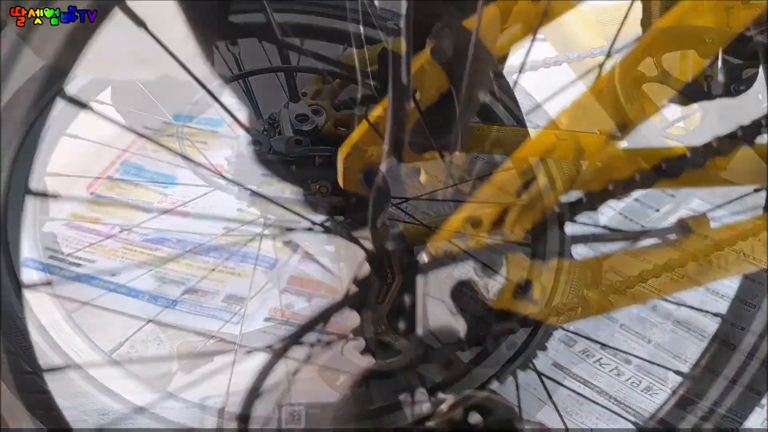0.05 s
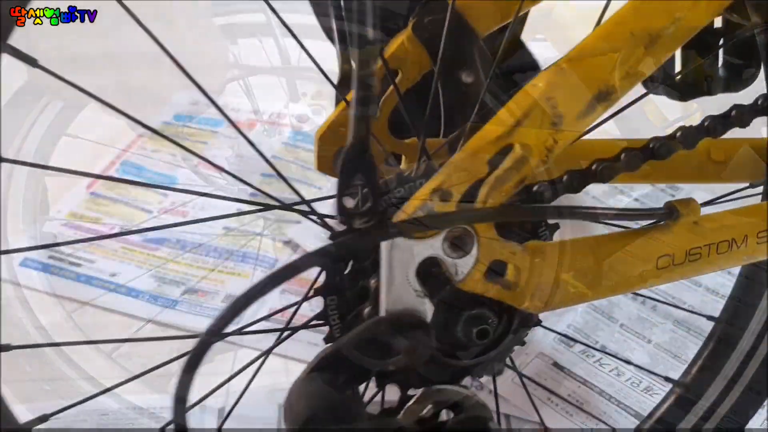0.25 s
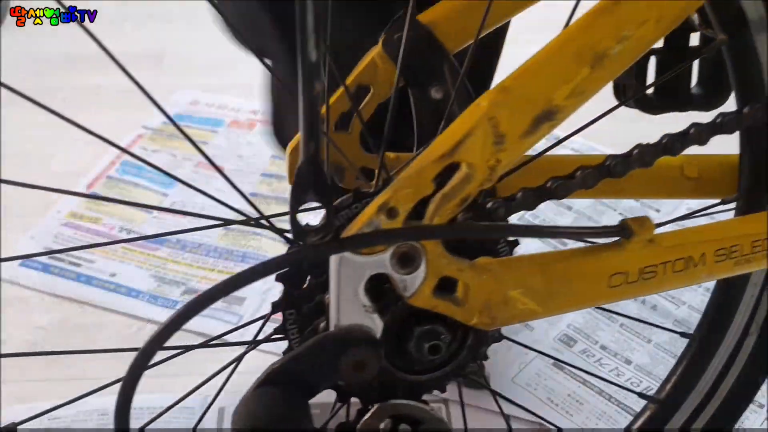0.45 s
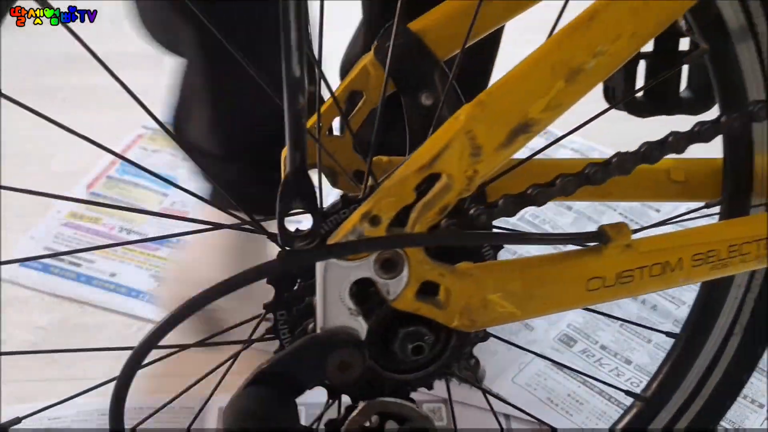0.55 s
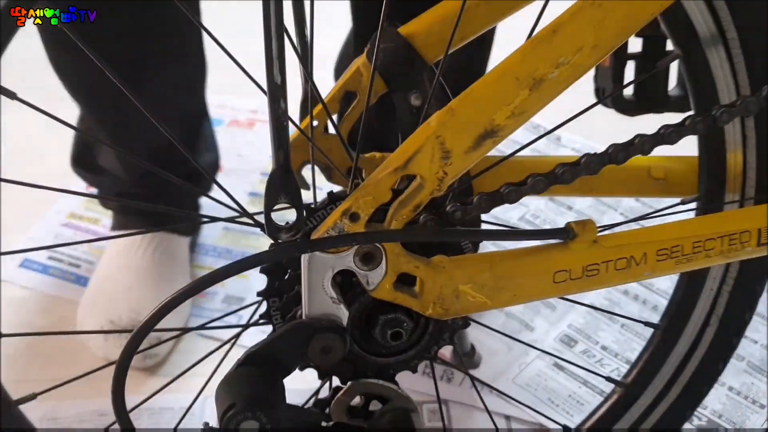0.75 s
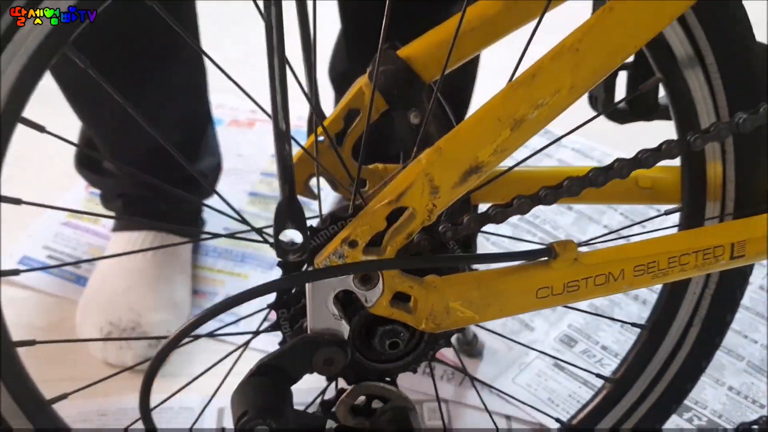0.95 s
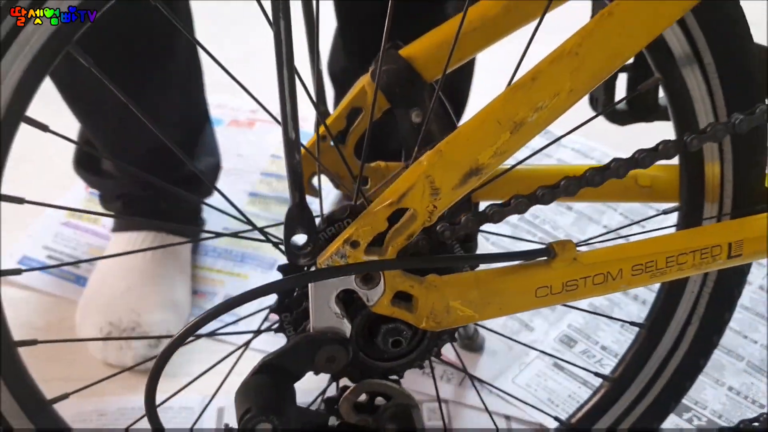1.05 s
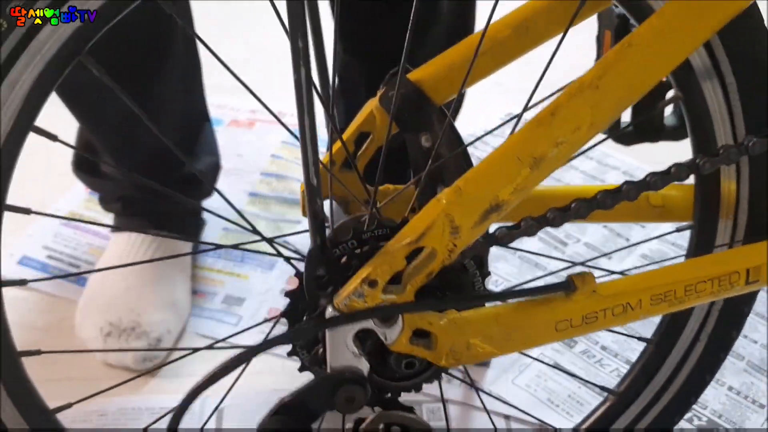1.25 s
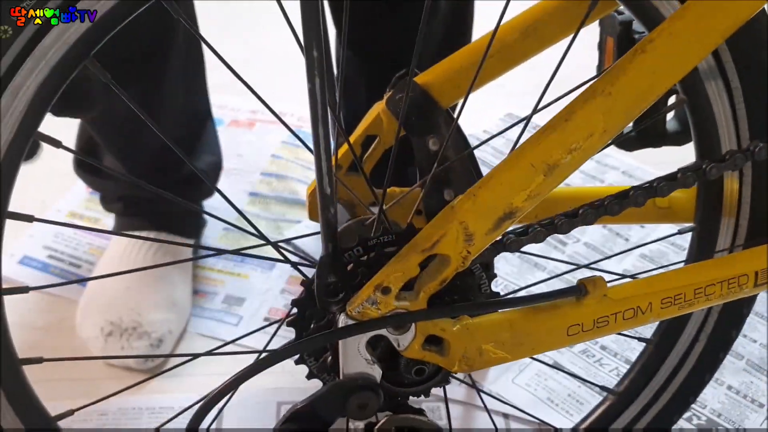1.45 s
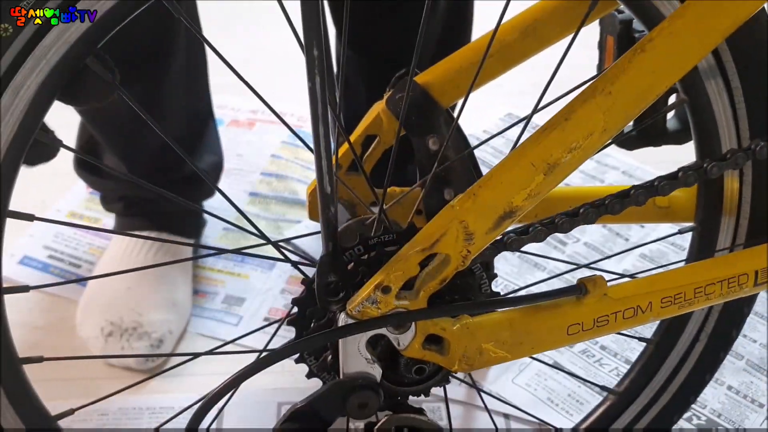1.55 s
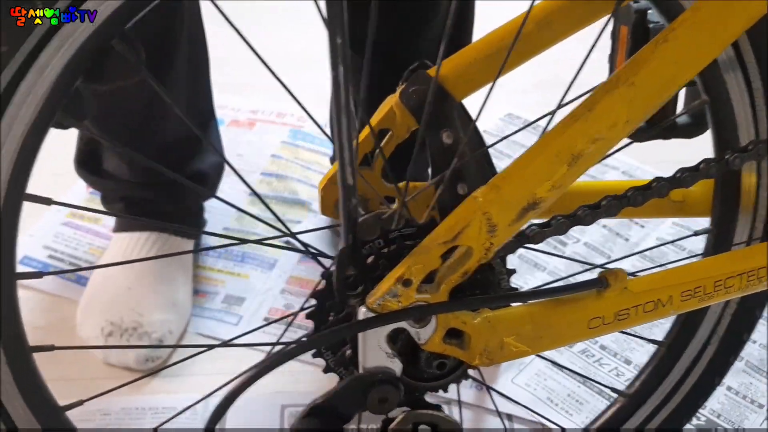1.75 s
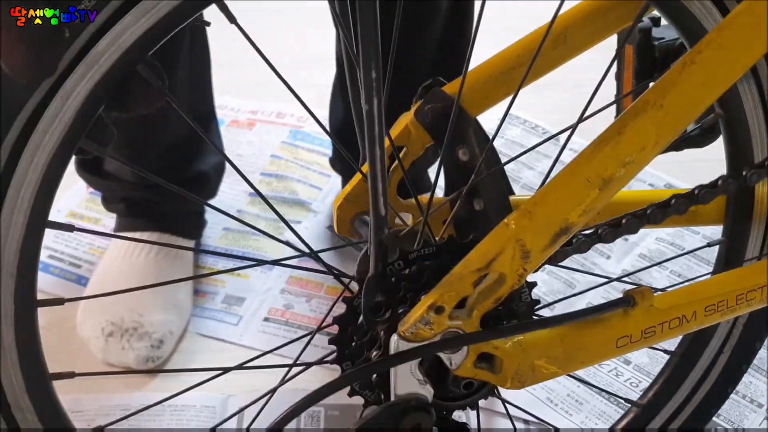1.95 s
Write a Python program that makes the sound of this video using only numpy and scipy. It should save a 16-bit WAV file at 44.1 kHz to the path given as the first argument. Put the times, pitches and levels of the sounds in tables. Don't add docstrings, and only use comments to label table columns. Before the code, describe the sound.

A bicycle strut scrapes and snaps onto its frame with a loud, bright clank at 0.14 seconds, rebounding rapidly and ringing briefly in a small hard room. A soft sock scuff comes near 0.5. At 1.07 a knock and tick arrive with a low microphone bump, then scattered clicks and dull knocks at 1.3, 1.5 and 1.8, ending in a busier cluster near 1.95. Newspaper rustles over faint rumble and hiss.

```python
import sys
import numpy as np
from scipy import signal
from scipy.io import wavfile

SR = 44100
rng = np.random.default_rng(int(sys.argv[2]) if len(sys.argv) > 2 else 0)


def rack_gain(trim_db):
    fader = np.asarray(trim_db, float)
    return 10 ** (fader / 20)


def to_wav(sig):
    pcm = np.clip(np.atleast_2d(sig), -1, 1) * 32767
    pcm = np.round(pcm).astype(np.int16)
    wavfile.write(sys.argv[1], SR, pcm.T)


N = 88200

# t/s, level/dB, left-right/dB
CLANK = [
    (.1410, -25, 4.0),
    (.1430, -12, 2.5),
    (.1476, -19, 2.5),
    (.1494, -20, 1.5),
    (.1532, -24, 1.5),
    (.1572, -22, 1.5),
    (.1622, -29, 1.5),
    (.1792, -33, 1.5),
]
# f/Hz, level/dB
CRACK = [(330, -23.5), (600, -6.5), (1500, -10), (3300, -3), (6500, -17), (11000, -14), (14500, -22.5),
         (16500, -50)]
EDGES = 25 * 2 ** np.arange(0, 9.6, .5)


def at_hz(points, hz):
    table = np.array(points)
    return np.interp(np.log(hz), np.log(table[:, 0]), table[:, 1])


def rms_one(x):
    return x / np.sqrt(np.mean(x ** 2) + 1e-20)


def drift(rate):
    points = rng.standard_normal(N // 200)
    return np.interp(np.arange(N) / SR * rate, np.arange(len(points)), points)


def ring(x, hz, t60):
    r, w = rack_gain(-60 / (t60 * SR)), 2 * np.pi * hz / SR
    return signal.lfilter([0, np.sin(w)], [1, -2 * r * np.cos(w), r * r], x + 1e-18)


def band(x, low, high):
    sos = signal.butter(2, [low, min(high, .45 * SR)], "band", fs=SR, output="sos")
    return signal.sosfilt(sos, x)


def coloured(x, spectrum, patchy_db=0):
    # f/Hz, likeness/1
    likeness = [(40, 0.44), (300, 0.77), (4000, 0.051), (15000, 0.032)]
    out = 0
    for k, (low, high) in enumerate(zip(EDGES, EDGES[1:])):
        mid, side = band(x[k % len(x)], low, high)
        hz = np.sqrt(low * high)
        alike = np.clip(at_hz(likeness, hz), -1, 1)
        ports = np.sqrt(1 + alike) * mid + np.sqrt(1 - alike) * side * [[1], [-1]]
        out = out + rack_gain(at_hz(spectrum, hz) + patchy_db * drift(13)) * ports
    return rms_one(out)


def grains(rate, spread_db):
    sizes = rack_gain(spread_db * np.minimum(rng.exponential(1, N), 4)) * rng.choice([-1, 1], N)
    return rms_one(sizes * (rng.random(N) < rate / SR))


def swell(rows):
    t = np.arange(N) / SR
    return sum(rack_gain(db) * np.interp(t, [s, s + rise, s + rise + fall], [0, 1, 0]) ** 0.86
               for s, rise, fall, db in rows)


def add(out, s, sound, pan_db):
    i = int(s * SR)
    sides = rack_gain(np.array([[pan_db / 2], [-pan_db / 2]]))
    out[:, i:i + sound.shape[-1]] += (sound * sides)[:, :N - i]


def hiss():
    # f/Hz, level/dB
    hiss_colour = [(150, -19.5), (300, -35.5), (700, -1.5), (2000, -8), (5000, -6), (8000, -16),
                   (11000, -9), (16000, -18)]
    noise = coloured(rng.standard_normal((2, 2, N)), hiss_colour, patchy_db=1.2)
    return rack_gain(-68.5) * noise * rack_gain(np.array([[.6], [-.6]]))


def rumble():
    # f/Hz, level/dB
    rumble_colour = [(25, -16.5), (50, -6.5), (80, -1.5), (130, -12.5), (220, -17.5), (400, -17),
                     (800, -42)]
    # t/s, rise/s, fall/s, level/dB
    flexes = [(-.05, 0.059, 0.27, -66), (.14, 0.031, 0.2, -55), (.37, 0.043, 0.028, -65.5),
              (.44, 0.029, 0.085, -61), (.59, 0.026, 0.093, -72), (.68, 0.024, 0.064, -68.5),
              (1.15, 0.04, 0.2, -70), (1.28, 0.041, 0.29, -57), (1.55, 0.069, 0.065, -67),
              (1.76, 0.023, .08, -67), (1.9, 0.037, 0.099, -46)]
    noise = coloured(rng.standard_normal((2, 2, N)), rumble_colour, patchy_db=1.2)
    return (rack_gain(-69.5) + swell(flexes)) * noise


def paper():
    # f/Hz, level/dB
    paper_colour = [(300, -23.5), (600, -2.5), (1000, -3), (2500, 0.5), (5000, -4.5), (8000, -10),
                    (12000, -8), (16000, -13.5)]
    # t/s, rise/s, fall/s, level/dB
    rustles = [(-.05, 0.046, 0.48, -53), (.43, 0.031, 0.091, -81), (.69, 0.015, 0.39, -64),
               (.85, 0.015, 0.051, -63.5), (.945, 0.015, 0.035, -63.5), (.975, 0.016, 0.13, -56),
               (1.06, 0.014, 0.16, -59.5), (1.24, 0.038, 0.066, -58.5), (1.29, 0.014, 0.16, -56.5),
               (1.41, 0.032, 0.1, -61.5), (1.49, 0.041, 0.085, -56), (1.76, 0.014, 0.097, -57),
               (1.82, 0.035, 0.062, -55.5), (1.89, 0.041, 0.077, -55), (1.94, 0.028, 0.046, -45.5)]
    grains_per_s, grain_db = 700, -5
    crackle = np.array([[grains(grains_per_s, 1.6), grains(grains_per_s, 4.0)]])
    rustle = rng.standard_normal((2, 2, N)) + rack_gain(grain_db) * crackle
    return swell(rustles) * coloured(rustle, paper_colour, patchy_db=2)


def bumps():
    # t/s, level/dB, f/Hz, t60/s
    bump_swings = [
        (1.004, -31.5, 261.5, 0.07),
        (1.004, -37.5, 128.5, 0.42),
        (1.013, -22, 53.7, 0.16),
        (1.054, -48.5, 53.3, 0.57),
        (1.905, -39, 58.4, 0.42),
        (1.944, -29.5, 57.6, 0.1),
    ]
    leak_db = -25.5
    out, t = np.zeros((2, N)), np.arange(SR // 2) / SR
    for s, db, hz, t60 in bump_swings:
        swing = -np.sin(2 * np.pi * hz * t) * rack_gain(-60 * t / t60) * np.minimum(t * hz * 2, 1)
        add(out, s, rack_gain(db + leak_db / 2) * swing[None], leak_db)
    return out


def rubbing(strokes, peaks):
    slips_per_s = 4500
    slips = np.array([grains(slips_per_s, 3.0), grains(slips_per_s, 3.0)])
    slips = slips + 0.4 * slips[::-1]
    body = sum(rack_gain(db) * rms_one(ring(slips, hz, 2.2 / width)) for hz, width, db in peaks)
    return swell(strokes) * rms_one(body)


def scuff():
    # t/s, rise/s, fall/s, level/dB
    scuff_strokes = [
        (.51, 0.053, 0.09, -59.5),
    ]
    # f/Hz, width/Hz, level/dB
    scuff_peaks = [(940, 360, 0.1), (1400, 220, 0), (2500, 180, 1.6), (3060, 160, 0.58)]
    return band(rubbing(scuff_strokes, scuff_peaks), 560, 3120)


def knocks():
    # t/s, peak/dB, f/Hz, t60/s, left-right/dB
    knock_hits = [(.07, -57.5, 450, 0.24, 4), (.705, -53.5, 726, 0.017, 4), (1.0738, -39, 377, 0.02, 1.5),
                  (1.0718, -35, 788, 0.039, 2.5), (1.0715, -32.5, 1860, 0.031, 9),
                  (1.13, -58, 290, 0.038, -5), (1.302, -49.5, 294, 0.22, 13), (1.3085, -36, 810, 0.022, 1),
                  (1.321, -44, 1400, 0.091, 1), (1.36, -50.5, 156.5, 0.14, -2),
                  (1.5165, -32, 670, 0.026, 0), (1.519, -42.5, 221.4, 0.02, 1), (1.536, -39, 640, 0.07, -2),
                  (1.552, -48.5, 700, 0.017, 2), (1.619, -48, 166.5, 0.074, -4),
                  (1.78, -56.5, 190, 0.063, 0), (1.83, -57, 265, 0.3, -10), (1.94, -37, 347, 0.028, -2),
                  (1.949, -43.5, 1260, 0.021, 12), (1.869, -49.5, 308, 0.24, -9),
                  (1.974, -39, 650, 0.077, 0)]
    # multiple of pitch/1, level/dB
    knock_body = [(.3, -24), (.55, -9.5), (.79, -2), (1.06, 3.8), (1.7, -8), (2.7, -13.5)]
    edge = .6
    out, t = np.zeros((2, N)), np.arange(SR // 4) / SR
    for s, db, hz, t60, pan_db in knock_hits:
        rough = rng.standard_normal((2, len(t))) * 0.72 + rng.standard_normal(len(t))
        push = rough * rack_gain(-60 * t / t60) + edge * np.sqrt(t60 * SR) * (t == 0)
        body = sum(rack_gain(g_db) * ring(push, hz * m, 17.6 / (hz * m)) * np.sqrt(m) for m, g_db in knock_body)
        add(out, s, rack_gain(db) * body / np.abs(body).max(), pan_db)
    return out


def ticks():
    # t/s, peak/dB, f/Hz, t60/s, left-right/dB
    tick_hits = [(.462, -53, 9540, .008, -4), (0.5157, -50.5, 7200, 0.0081, 7),
                 (0.7072, -55.5, 3580, 0.017, 10), (0.858, -47, 3600, 0.032, -2),
                 (.957, -57.5, 1076, 0.033, 2), (0.964, -61, 2960, 0.018, 3),
                 (0.997, -47.5, 2470, 0.023, 7), (1.033, -52.5, 9000, 0.02, 2),
                 (1.0698, -34.5, 8100, 0.017, 3.5), (1.0692, -38, 4400, 0.0068, 5),
                 (1.14, -45, 1730, 0.013, 7.5), (1.277, -51, 3000, 0.011, 4),
                 (1.3065, -45.5, 2630, 0.052, 4), (1.309, -49.5, 1120, 0.034, 9),
                 (1.42, -51, 2140, 0.04, 3), (1.504, -56, 2500, 0.012, 6), (1.514, -53, 3060, .02, 10),
                 (1.5324, -44, 6200, 0.011, 15.5), (1.5338, -41, 4440, 0.0093, 5),
                 (1.548, -50, 1810, 0.011, 13), (1.727, -57, 4500, 0.025, 4), (1.7293, -50, 1900, 0.017, 6),
                 (1.7392, -48.5, 7650, 0.0093, 3), (1.766, -54, 5950, 0.0072, 3),
                 (1.7745, -35.5, 4200, 0.0037, 15.5), (1.788, -48, 3500, .01, 10),
                 (1.854, -43.5, 3620, 0.01, 15.5), (1.928, -52.5, 4400, 0.0091, 28),
                 (1.9385, -46, 4400, 0.015, 7), (1.946, -36.5, 3540, 0.0094, 8),
                 (1.956, -37, 3400, 0.0086, 5), (1.960, -42, 4700, 0.04, 10),
                 (1.9615, -41.5, 9150, .04, -7), (1.968, -43, 5940, 0.033, 3)]
    broad_db, width, reach = -4, 1.3, 2.6
    out, t = np.zeros((2, N)), np.arange(SR // 8) / SR
    for s, db, hz, t60, pan_db in tick_hits:
        a, b = rng.standard_normal((2, 2, len(t))) + rng.standard_normal((2, 1, len(t)))
        fade = rack_gain(-60 * t / t60) * np.minimum(t / .0007, 1)
        pitched = rms_one(band(a, hz / width, hz * width))
        broad = rms_one(band(b, hz / reach, hz * reach))
        add(out, s - .001, rack_gain(db - 1) * (pitched + rack_gain(broad_db) * broad) * fade, pan_db)
    return out


def slide():
    # t/s, rise/s, fall/s, level/dB
    slide_strokes = [
        (-.012, 0.016, 0.036, -57),
        (.044, 0.035, 0.024, -42),
        (.11, 0.006, 0.022, -48.5),
    ]
    # f/Hz, width/Hz, level/dB
    slide_peaks = [(1400, 300, -12), (1960, 240, -4), (3000, 500, -12), (3800, 480, 1.5), (5300, 300, -14),
                   (7200, 900, -15)]
    return band(rubbing(slide_strokes, slide_peaks), 1100, 13000)


def clank():
    # f/Hz, level/dB, t60/s
    frame_modes = [(542.1, -5.5, 0.057), (700, -10.5, 0.025), (882, -16.5, .08), (1251, -12, 0.032),
                   (1892, -14, 0.042), (2110, -15.5, 0.028), (2368, -20, 0.042), (2733, -14, 0.078),
                   (2885, -6, 0.035), (2960, -14, 0.046), (3248, 2, 0.031), (3378, -2.5, 0.043),
                   (3736, -8.5, 0.053), (4560, -26.5, 0.054)]
    ring_db, crack_db, crack_t60 = -9, -4, 0.033
    port_slip = .16
    rings, cracks, t = np.zeros((2, N)), np.zeros((2, N)), np.arange(SR // 4) / SR
    crack = coloured(rng.standard_normal((2, 2, N)), CRACK)
    hz, level_db, t60 = np.array(frame_modes).T[:, :, None, None]
    phase = rng.uniform(0, 1, hz.shape) - 2 * np.pi * hz * CLANK[1][0]
    phase = phase + port_slip * hz / 1000 * rng.normal(0, 1, (len(frame_modes), 2, 1))
    for k, (s, db, pan_db) in enumerate(CLANK):
        strength_db = rng.normal(0, 0.67, (len(frame_modes), 1, 1))
        swing = np.sin(2 * np.pi * hz * (t + int(s * SR) / SR) + phase) * np.minimum(t * hz, 1)
        modes = np.sum(swing * rack_gain(level_db + strength_db - 60 * t / t60), axis=0)
        add(rings, s, rack_gain(db + ring_db) * modes, pan_db)
        burst = crack[:, 2000 * (k + 1):][:, :len(t)]
        add(cracks, s, burst * rack_gain(db + crack_db - 60 * t / crack_t60), pan_db)
    return rings + cracks


def blow():
    click = np.zeros((2, 2, N)) + 1e-18
    click[:, 0, int(CLANK[1][0] * SR)] = 1, -1
    return rack_gain(-47) * coloured(click, CRACK)


def room(x):
    # f/Hz, t60/s
    room_t60 = [(100, 0.24), (500, 0.46), (1500, 0.52), (4000, 0.48), (12000, 0.38)]
    # f/Hz, level/dB
    room_colour = [(100, 13.5), (500, 6), (1500, 2.5), (4000, 0.5), (12000, -0.5)]
    onset_s = 0.0045
    t, tail = np.arange(SR) / SR, 0
    white = rng.standard_normal((2, 2, SR)) + .5 * rng.standard_normal((2, 1, SR))
    for k, (low, high) in enumerate(zip(EDGES, EDGES[1:])):
        hz = np.sqrt(low * high)
        fade = rack_gain(at_hz(room_colour, hz) - 60 * t / at_hz(room_t60, hz))
        tail = tail + band(white[k % 2], low, high) * fade
    tail = tail * np.clip(t / onset_s - .5, 0, 1)
    tail = tail / np.sqrt(np.sum(tail ** 2) / 2)
    return signal.fftconvolve(x.mean(axis=0)[None], tail, axes=1)[:, :N]


def scene():
    metal, tick, knock = clank(), ticks(), knocks()
    rubs = slide() + scuff()
    to_room = blow() + rack_gain(-11) * (metal + tick) + rack_gain(-12) * (knock + rubs)
    close = metal + tick + knock + rubs
    return close + room(to_room) + bumps() + paper() + rumble() + hiss()


def band_limit(x):
    return signal.sosfilt(signal.butter(12, 16520, fs=SR, output="sos"), x)


def record(dry):
    low_cut = signal.butter(4, 38, "high", fs=SR, output="sos")
    top_cut = signal.cheby2(10, 60, 16800, fs=SR, output="sos")
    return band_limit(signal.sosfilt(np.vstack([low_cut, top_cut]), dry))


dry = scene()
out = record(dry)
to_wav(out)
```